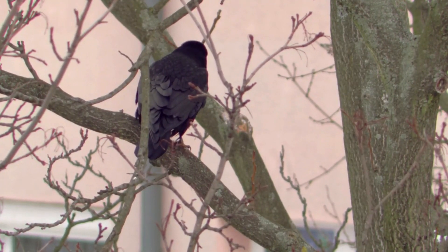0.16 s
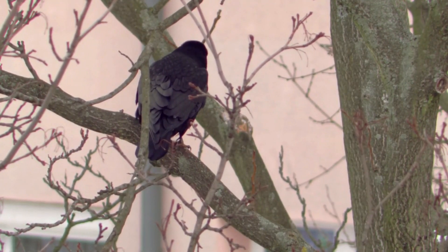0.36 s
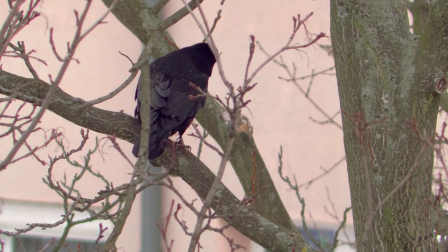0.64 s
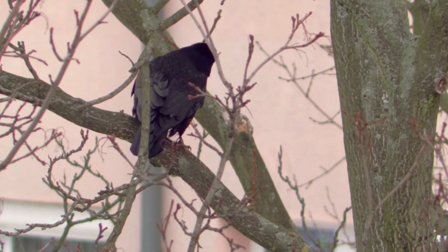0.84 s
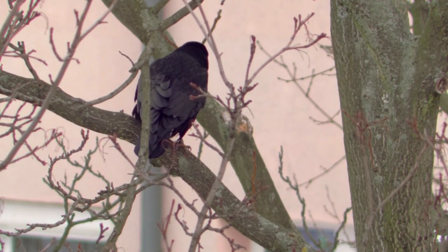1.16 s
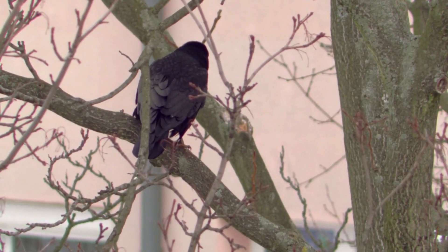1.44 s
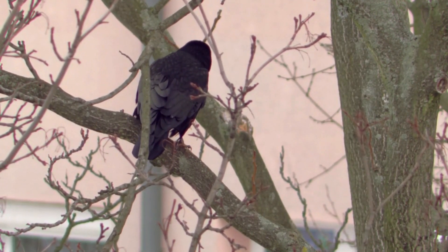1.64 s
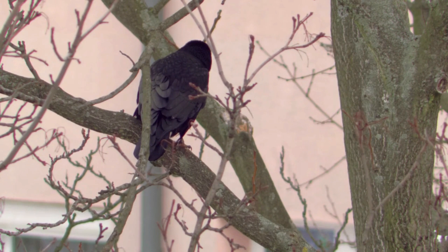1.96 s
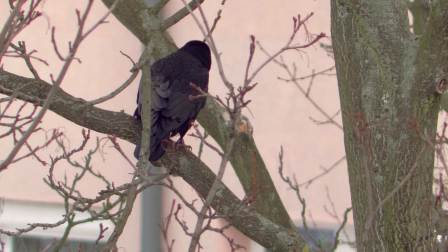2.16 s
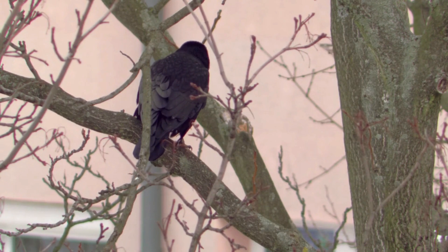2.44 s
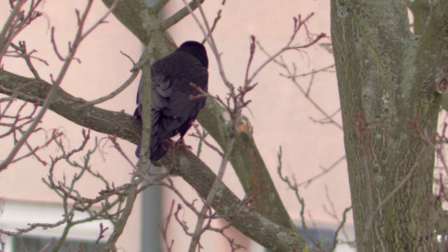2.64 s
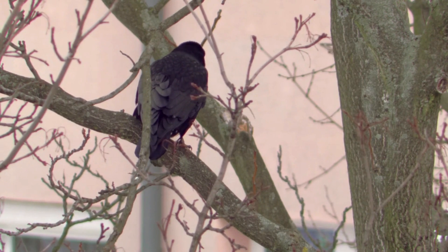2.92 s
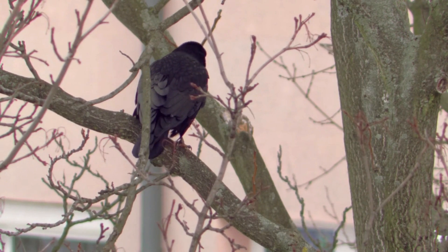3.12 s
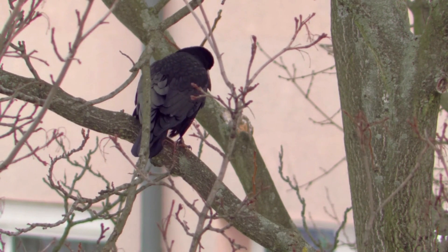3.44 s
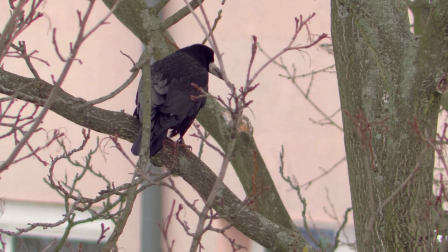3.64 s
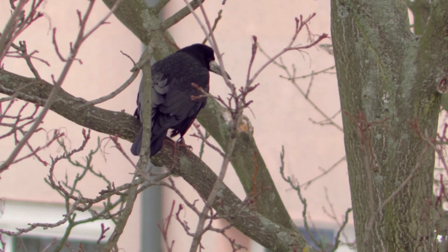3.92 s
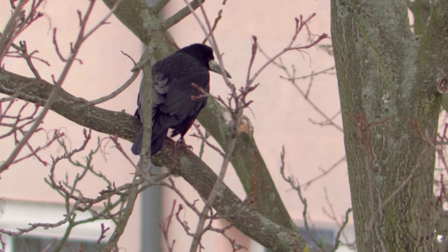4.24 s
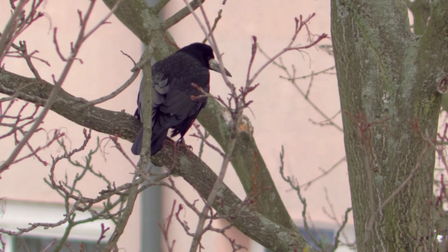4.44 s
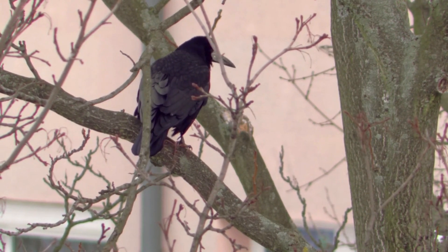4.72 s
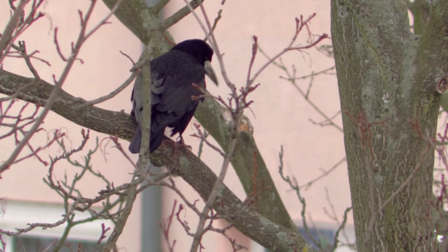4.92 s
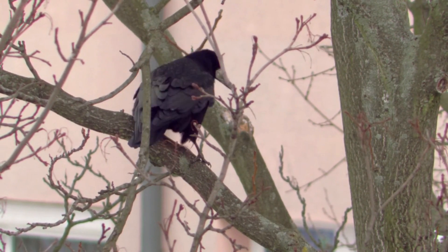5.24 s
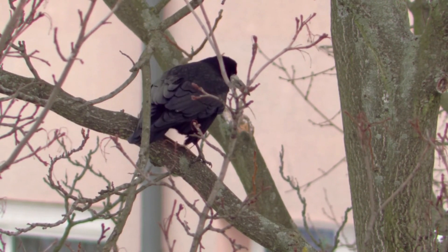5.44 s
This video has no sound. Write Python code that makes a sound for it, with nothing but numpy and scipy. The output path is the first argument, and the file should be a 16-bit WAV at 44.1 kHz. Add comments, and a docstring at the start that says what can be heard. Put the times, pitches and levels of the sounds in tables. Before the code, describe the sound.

Outdoors among houses, a faint, steady wash of distant traffic runs throughout. A crow close to the microphone caws twice in quick succession, harsh and raspy, each call sagging in pitch and leaving a faint echo. Three light, dry ticks of beak or claw on a branch follow. Small birds chirp very faintly far away, and a soft low hum swells briefly near the end.

```python
"""Among houses, close to a crow on a bare branch, with a steady wash of distant traffic all around.
The crow caws twice: its fluttering syrinx buzzes through throat and beak, torn air adds a rasp,
and the pitch rises quickly, then sags as the air runs out. The houses return a faint echo.
Three light ticks of beak or claw follow from the perch. Small birds chirp far from the
microphone, and near the end a low hum swells once."""
import sys
import numpy as np
from scipy import signal
from scipy.fft import rfft, irfft, next_fast_len
from scipy.io import wavfile
from scipy.ndimage import uniform_filter1d

SR = 44100
rng = np.random.default_rng(int(sys.argv[2]) if len(sys.argv) > 2 else 0)


def log_audio(samples):
    """Write samples as a 16-bit WAV file to the path given in sys.argv[1]."""
    # one column per channel
    frames = np.atleast_2d(samples).T
    # limit to full scale, then quantise
    limited = np.clip(frames, -1, 1)
    pcm = np.round(limited * 32767).astype(np.int16)
    wavfile.write(sys.argv[1], SR, pcm)


N = 246078
TIME = np.arange(N) / SR

# Distant traffic. Each row: frequency in Hz, relative level in dB.
TRAFFIC_SPECTRUM = [(15, -76), (25, -24.5), (96, -9.5), (183, -9.5), (221, -8), (281, -6.5), (305, -3.5),
                    (340, -7.5), (631, -5), (804, 0), (1750, -9.5), (2920, -25.5), (3720, -28),
                    (5730, -35.5), (15500, -47.5)]
# Its slow drift. Each row: time in seconds, level in dB.
TRAFFIC_DRIFT = [(0, -44), (1.2, -45.5), (3, -44), (4.3, -44), (5.58, -45)]
# Stereo width of sound from all around. Each row: frequency in Hz, side relative to mid in dB.
SIDE_SPECTRUM = [(60, -22), (700, -19), (1300, -18), (2400, -9), (4400, -4), (15000, -3)]
# Far songbirds. Each row: start in seconds, length in seconds, first and last pitch in Hz,
# relative level in dB, buzz as a share of pitch.
FAR_CHIRPS = [(0.263, 0.14, 5280, 3850, -70, .04), (0.538, 0.27, 2655, 2696, -66, 0.0063),
              (2.546, 0.068, 4280, 3850, -59, 0.076), (2.778, 0.037, 4430, 3690, -67, .04),
              (3.299, 0.14, 2985, 2950, -65, .004), (3.778, 0.13, 4800, 4860, -64.5, 0.035),
              (4.158, 0.1, 4130, 3110, -61, 0.034), (4.36, 0.053, 4720, 5100, -68, 0.036),
              (5.022, 0.035, 5180, 5000, -68.5, 0.044), (5.23, 0.035, 5130, 4810, -69.5, 0.034)]
# The syrinx sputters before it catches. Each row: time in seconds, level in dB.
SYRINX_SPUTTERS = [(1.429, -28.5), (1.445, -13.5), (2.033, -30)]
# The close caws. Each row: start and length in seconds, level before losses in dB, held pitch in Hz,
# leap as a share of pitch, leap time in seconds, jolt at the leap in dB; then, in seconds, end of the
# held pitch, time of widest beak, span of open beak, time the voice clears, time it breaks; last, broken
# roughness from 0 to 1, nasal ring in dB, throat tuning as a factor. Times run from the caw's start.
CROW_CAWS = [(1.449, 0.36, -6.5, 412.5, .15, .049, .5, .122, 0.17, 0.26, 0.043, 0.203, 0.4, 9.0, 0.979),
             (2.042, 0.32, -6, 411.9, .19, .058, 5.0, .177, .165, 0.23, 0.065, .255, 0.34, 3.5, 0.994)]
# Flutter of the syrinx in each caw. Each row: time of one crest in seconds, rate in Hz,
# depth as a share of pitch.
SYRINX_FLUTTER = [(1.559, 53, .04), (2.203, 44, .046)]
# The throat with the beak nearly shut. Each row: frequency in Hz, gain in dB.
THROAT_SPECTRUM = [(300, -9), (620, -26.5), (850, -13.5), (1050, -1), (1250, -2), (1500, 3.5), (1640, 0.5),
                   (1800, -8.5), (2060, -5.5), (2330, -17), (2600, -11.5), (2980, -13.5), (3300, -24.5),
                   (4200, -51), (6000, -69)]
# What opening the beak adds. Each row: frequency in Hz, gain in dB.
OPEN_BEAK_GAIN = [(900, -0.5), (1400, 1), (1700, 0.5), (2050, 12), (2400, 3), (2950, 4)]
# The rasp of torn air. Each row: frequency in Hz, relative level in dB.
RASP_SPECTRUM = [(2500, -43.5), (3450, 7), (4000, -7), (4650, -4.5), (5050, 2.5), (5320, -9), (5600, 3),
                 (6600, -1), (7100, 5), (7750, -5), (8550, 2.5), (10000, -5), (12000, -13.5), (15000, -26)]
# A spent voice's rasp against a fresh one's. Each row: frequency in Hz, gain in dB.
SPENT_RASP_GAIN = [(3500, 4.5), (5700, 1.5), (8000, -10), (12000, -18.5)]
# The echo off the houses. Each row: frequency in Hz, gain in dB.
ECHO_SPECTRUM = [(300, -4.5), (1300, 2), (2100, -2), (2950, -2.5), (3500, 0.5), (5500, 2.5), (9000, 2.5),
                 (15000, -27.5)]
# Beak or claw on the perch. Each row: start in seconds, level in dB, ring in Hz.
PERCH_TICKS = [(3.2881, -24, 3400), (3.613, -29, 3630), (3.655, -26, 3740)]
# The modes of a tick. Each row: multiple of its ring, gain in dB, seconds to fall by 60 dB.
PERCH_MODES = [(.85, -20, 0.08), (0.999, 3.5, 0.01), (1.12, -31, .015)]
# A tick's dry crack. Each row: frequency in Hz, gain in dB.
CRACK_SPECTRUM = [(1500, -17), (2800, 9.5), (3800, 6), (4800, -18), (6500, -5), (9000, -11), (14000, -32)]


def from_db(db):
    """Decibels to gain."""
    return 10 ** (np.asarray(db) / 20)


def unit_power(x):
    """Scale to a mean square of 1."""
    return x / np.sqrt(np.mean(x ** 2) + 1e-20)


def cut(x, hz, kind, order=2):
    """Butterworth low- or high-pass."""
    return signal.sosfilt(signal.butter(order, hz, kind, fs=SR, output="sos"), x)


def evened(x, window_s=.004):
    """Hold the short-term level at 1."""
    return x / np.sqrt(np.maximum(uniform_filter1d(x * x, int(window_s * SR)), 0) + 1e-12)


def db_at(spectrum, hz):
    """Read a (Hz, dB) spectrum along a logarithmic frequency axis."""
    knots, db = np.transpose(spectrum)
    return np.interp(np.log(np.maximum(hz, 1)), np.log(knots), db)


def colour(x, spectrum):
    """Shape a sound by a (Hz, dB) spectrum."""
    length = x.shape[-1]
    size = next_fast_len(length + 4096)
    gain = from_db(db_at(spectrum, np.fft.rfftfreq(size, 1 / SR)))
    return irfft(rfft(x, size) * gain, size)[..., :length]


def wobble(rate_hz, shape=N):
    """Random motion up to a given rate, spread 1."""
    return unit_power(cut(rng.standard_normal(shape), rate_hz, "low"))


def bump(x, centre, width):
    """A bell curve of height 1."""
    return np.exp(-((x - centre) / width) ** 2)


def diffuse_noise(size=N):
    """Noise reaching the microphone from all around: alike in the bass, wider in the treble."""
    mid, side = rng.standard_normal((2, size))
    return mid + colour(side, SIDE_SPECTRUM) * [[1], [-1]]


def distant_traffic(waver_db=1.0):
    """Tyre noise from far off merges into a steady wash."""
    level_db = np.interp(TIME, *np.transpose(TRAFFIC_DRIFT))
    wash = unit_power(colour(diffuse_noise(), TRAFFIC_SPECTRUM))
    return wash * from_db(level_db + waver_db * wobble(3.2))


def far_songbirds():
    """Thin gliding whistles, some of them buzzy, blurred by their way through the trees."""
    out, buzz, blur = np.zeros(N), wobble(350), wobble(110)
    for start, length, first_hz, last_hz, db, buzz_share in FAR_CHIRPS:
        along = np.clip((TIME - start) / length, 0, 1)
        hz = (first_hz + (last_hz - first_hz) * along) * (1 + buzz_share * buzz)
        out += from_db(db) * 2 * np.sin(np.pi * along) * np.sin(2 * np.pi * np.cumsum(hz) / SR)
    return out * (.8 + .45 * blur)


def breath(row, t, onset_rough=.65, clear_rough=.17, rough_loss_db=9.5):
    """One push of air drives a caw's pitch, roughness and level while the beak opens and shuts."""
    start, length, db, held_hz, leap, leap_s, jolt_db, held_s = row[:8]
    widest_s, open_s, clear_s, break_s, broken_rough = row[8:13]
    age, left = np.maximum(t - start, 0), np.maximum(start + length - t, 0)
    spent = np.clip((age - held_s) / (length - held_s), 0, 1)
    # The pitch scoops up, leaps, holds, sags as the air runs out and droops at the very end.
    scoop, droop = .11 * np.exp(-age / .025), .2 * np.exp(-left / .016)
    hz = held_hz * (1 - scoop + leap * bump(age, leap_s, .022) - .23 * spent - droop)
    # The voice starts rough, clears and breaks up again.
    breaking = (1 + np.tanh((age - break_s) / .013)) / 2
    rough = clear_rough + (onset_rough - clear_rough) * bump(age, 0, clear_s)
    rough += (broken_rough - clear_rough) * breaking
    opening = bump(age, widest_s, open_s / 2)
    # The level swells, jolts at the leap, fades and is released; a rough voice carries less.
    attack_db, fade_db, release_db = 4.5 * np.exp(-age / .012), 2.5 * spent ** 2, 23.5 * np.exp(-left / .028)
    level_db = db - attack_db + jolt_db * bump(age, leap_s, .007) - fade_db - release_db
    level_db -= rough_loss_db * rough
    sounding = np.clip(np.minimum(age / .0033, left / .017), 0, 1)
    sputter = sum(from_db(peak_db) * bump(t, at_s, .0045) for at_s, peak_db in SYRINX_SPUTTERS)
    force = np.maximum(sounding * from_db(level_db), sputter)
    rasp_db = -17 - 12 * np.exp(-age / .025)  # relative to the voice; builds later than the tone
    return hz, rough, opening, spent, 20 * np.log10(force + 1e-12), rasp_db


def overtones(phases, db, rough):
    """A stack of harmonics of unit power; each flickers and slips in phase, the low ones slipping least."""
    gain = from_db(db + (2.5 + 3 * rough) * wobble(70, db.shape))
    looseness = np.minimum(np.arange(1, len(db) + 1) / 4, 1)[:, None]
    slip = .8 * wobble(10, db.shape) + .7 * looseness * rough * wobble(110, db.shape)
    offsets = rng.uniform(0, 2 * np.pi, (len(db), 1))
    return np.sum(gain * np.cos(phases + offsets + slip), axis=0) / np.sqrt(np.sum(gain ** 2, axis=0) / 2)


def throat(harmonic_hz, opening, spent, nasal_db, tuning, tighten_share=.06, nasal_hz=2950):
    """Gain in dB of throat, beak and a narrow nasal ring; all rise in pitch as the throat tightens."""
    hz = harmonic_hz / (tuning * (1 + tighten_share * spent))
    nasal_ring_db = nasal_db * bump(hz, nasal_hz, width=130)
    return db_at(THROAT_SPECTRUM, hz) + opening * db_at(OPEN_BEAK_GAIN, hz) + nasal_ring_db


def syrinx_voice(phases, harmonic_db, puffs, rough):
    """Buzz and turbulence from the driven syrinx, which swings at nearly even strength within a cycle."""
    turbulence = unit_power(colour(puffs * rng.standard_normal(len(puffs)), THROAT_SPECTRUM))
    voice = evened(overtones(phases, harmonic_db, rough) + .33 * rough ** 1.5 * turbulence)
    swing = np.abs(signal.hilbert(voice))
    return cut(evened(voice / (.5 + swing) ** .5), 540, "high", order=6)


def air_rasp(phases, harmonic_hz, puffs, rough, spent, side_db=-18.5):
    """Air torn off each cycle makes high overtones and hiss, scattered to both sides."""
    mid, side = (overtones(phases, db_at(RASP_SPECTRUM, harmonic_hz), rough) for _ in range(2))
    hiss = unit_power(colour(puffs * diffuse_noise(len(puffs)), RASP_SPECTRUM))
    rasp = unit_power(mid + from_db(side_db) * side * [[1], [-1]] + .55 * hiss)
    return (1 - spent) * rasp + spent * colour(rasp, SPENT_RASP_GAIN)


def crow_caw(row, flutter, harmonics=36, dying_second_db=20):
    """Close to the microphone, a fluttering syrinx sends a harsh buzz through throat and beak."""
    crest_s, flutter_hz, depth = flutter
    nasal_db, tuning = row[-2:]
    first, size = round((crest_s - .25) * SR), round(.6 * SR)
    t = TIME[first:first + size]
    hz, rough, opening, spent, force_db, rasp_db = breath(row, t)
    rough = np.clip(rough, .12, .9)
    # With each flutter the pitch creeps up and slips back, a little unevenly.
    turn = 2 * np.pi * flutter_hz * (t - crest_s) + 2 * np.pi / 3 + .45 * wobble(15, size)
    sway = np.sin(turn) - .4 * np.sin(2 * turn)
    hz = hz * (1 + depth * sway + .04 * rough * wobble(220, size))
    phase = 2 * np.pi * np.cumsum(hz) / SR
    k = np.arange(1, harmonics + 1)[:, None]
    # The tone brightens as each flutter climbs; the second harmonic comes forward as the voice dies.
    harmonic_db = throat(k * hz, opening + .16 * sway, spent, nasal_db, tuning)
    harmonic_db += dying_second_db * spent ** 2 * (k == 2)
    puffs = unit_power(np.exp(1.2 * np.cos(phase)))
    voice = syrinx_voice(k * phase, harmonic_db, puffs, rough)
    # The weak fundamental throbs hoarsely and follows the force only loosely.
    fundamental_db = -35 + .65 * force_db + 3 * sway + 4 * wobble(60, size)
    fundamental = from_db(fundamental_db) * np.cos(phase + .45 * wobble(70, size))
    rasp = air_rasp(k * phase, k * hz, puffs, rough, spent)
    throb_db, shimmer_db = .78 * sway, 5 * rough * wobble(152, size)
    rasp *= from_db(rasp_db + 1.1 * wobble(84, size))
    out = np.zeros((2, N))
    out[:, first:first + size] = from_db(force_db + throb_db + shimmer_db) * (voice + rasp) + fundamental
    return out


def treble_ridges(x, ridge_db=5.8, count=100):
    """Narrow ridges and notches colour the treble, with a mean power gain near 1."""
    hz = np.geomspace(3600, 15000, count)
    gain = unit_power(from_db(ridge_db * np.clip(rng.standard_normal(count), -1.6, 1.3)))
    return colour(x, [(3400, 0), *zip(hz, 20 * np.log10(gain))])


def trunk_reflection(x, bounce_db=-28.0, lags_s=(.0021, .0023)):
    """The trunk beside the bird throws back a quick reflection, reaching left just before right."""
    delayed = [np.interp(TIME - lag, TIME, channel) for lag, channel in zip(lags_s, x)]
    return from_db(bounce_db) * np.array(delayed)


def house_echo(x, t60_s=1.74, treble_t60_s=.22, split_hz=3500, build_s=.012, echo_db=-22.5):
    """Reflections scattered between the houses build up and die away, the treble first."""
    scatter = colour(diffuse_noise(), ECHO_SPECTRUM)
    decay = from_db(-60 * TIME / t60_s)
    low = cut(scatter, split_hz, "low") * decay
    high = cut(scatter, split_hz, "high") * from_db(-60 * TIME / treble_t60_s)
    response = (low - high) * (1 - np.exp(-TIME / build_s)) / np.sqrt(np.sum(decay ** 2))
    return from_db(echo_db) * signal.fftconvolve(x, response, axes=1)[:, :N]


def perch_ticks(contact_s=.0007, crack_db=-11.0, crack_t60_s=.038):
    """Beak or claw strikes the nearby perch: a dry crack rings a few short modes."""
    out = np.zeros(N)
    for start, db, hz in PERCH_TICKS:
        age = np.maximum(TIME - start, 0)
        ring = sum(from_db(mode_db - 60 * age / t60_s) * np.sin(2 * np.pi * hz * ratio * age)
                   for ratio, mode_db, t60_s in PERCH_MODES)
        crack = from_db(crack_db - 60 * age / crack_t60_s) * colour(rng.standard_normal(N), CRACK_SPECTRUM)
        out += from_db(db) * (1 - np.exp(-age / contact_s)) * (ring + crack)
    return out


def distant_hum(at_s=5.26, swell_s=.082, hz=229, db=-49.5):
    """A faint low hum swells briefly in the distance."""
    return from_db(db) * bump(TIME, at_s, swell_s) * np.sin(2 * np.pi * hz * TIME + .36 * wobble(26.3))


def scene(far_echo_db=14.5):
    """The crow close to the microphone; behind it songbirds, with more echo, and traffic and hum."""
    caws = sum(crow_caw(row, flutter) for row, flutter in zip(CROW_CAWS, SYRINX_FLUTTER))
    ticks, birds = perch_ticks(), far_songbirds()
    crow = caws + ticks
    close = treble_ridges(caws) + ticks + trunk_reflection(crow)
    echo = house_echo(crow + from_db(far_echo_db) * birds)
    return close + birds + echo + distant_traffic() + distant_hum()


def record(dry, ceiling=.87, thud_db=-7.5, thud_hz=110, cutoff_hz=15300):
    """The loudest crests are flattened a little unevenly, which leaves a low flutter; the top is cut."""
    flattened = dry / (1 + np.abs(dry / ceiling) ** 10) ** (1 / 10)
    excess = np.abs(dry - flattened)
    thud = from_db(thud_db) * cut(cut(excess, 25, "high"), thud_hz, "low")
    return signal.sosfilt(signal.ellip(10, .1, 80, cutoff_hz, fs=SR, output="sos"), flattened + thud)


dry = scene()
out = record(dry)
log_audio(out)
```